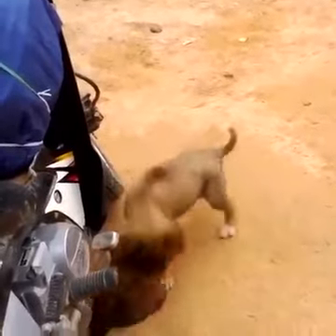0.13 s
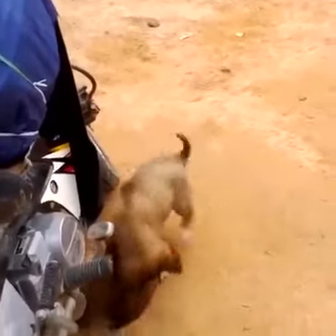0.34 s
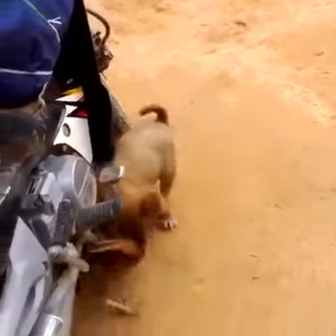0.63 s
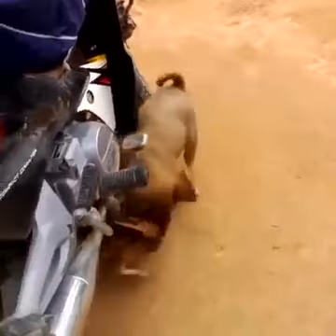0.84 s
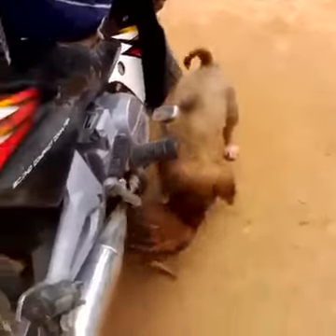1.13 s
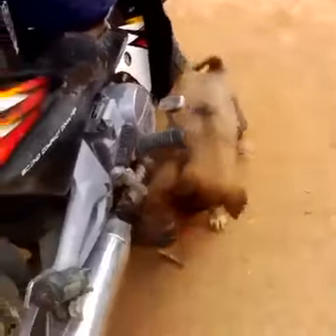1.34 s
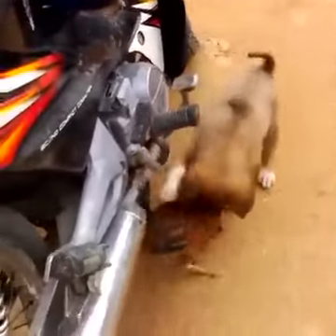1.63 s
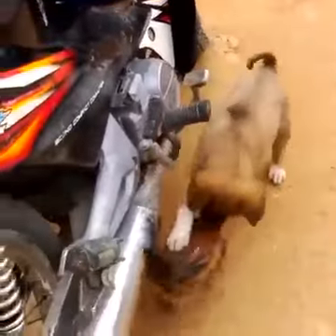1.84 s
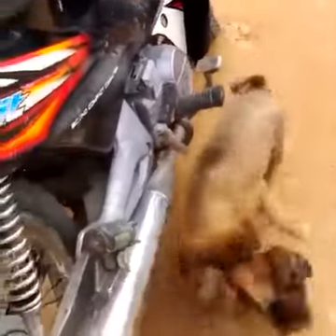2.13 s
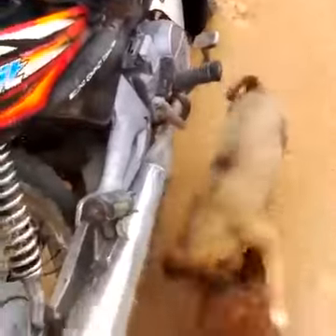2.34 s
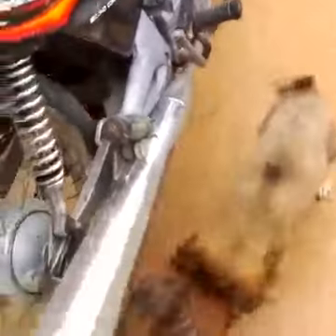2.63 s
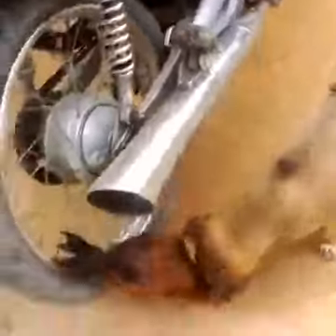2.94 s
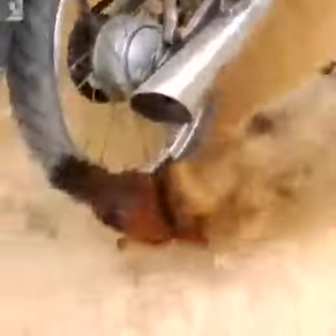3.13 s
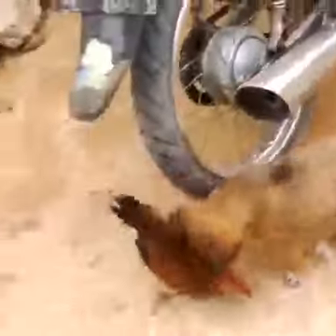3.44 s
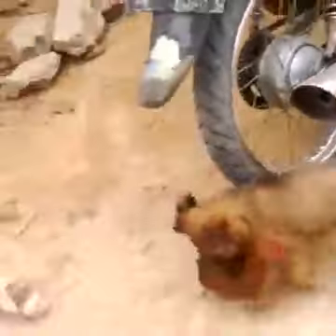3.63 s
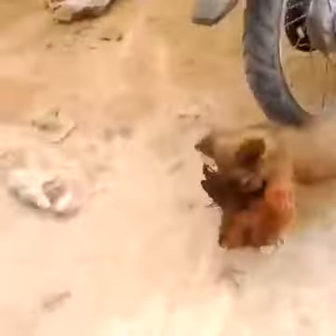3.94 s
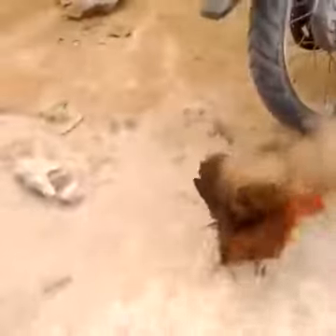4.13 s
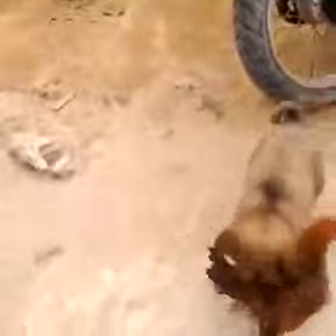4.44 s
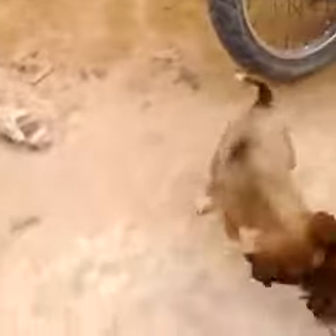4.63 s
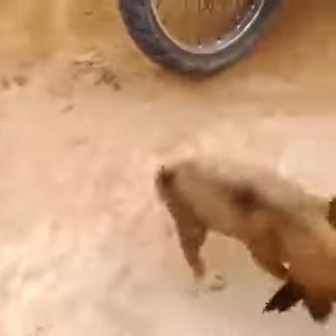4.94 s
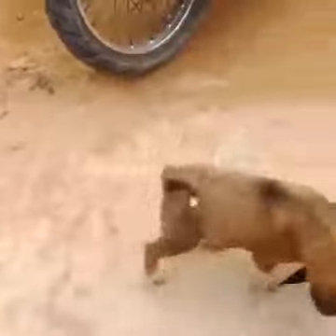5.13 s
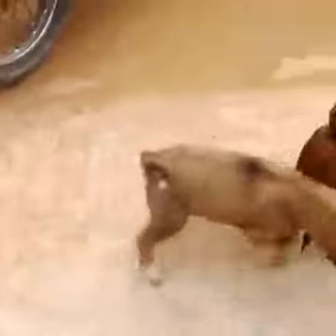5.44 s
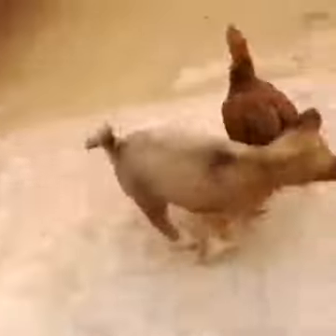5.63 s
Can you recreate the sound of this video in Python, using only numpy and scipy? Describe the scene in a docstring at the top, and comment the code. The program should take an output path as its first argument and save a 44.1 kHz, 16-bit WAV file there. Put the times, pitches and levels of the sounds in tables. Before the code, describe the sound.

A close, dry outdoor scene with a steady soft rush and low puffs of moving air. From 0.06 to 0.4 s a hen makes a thin, lurching high squeal with hoarse rasp, ending in a squawk. Abrupt squawks, each breaking from high to lower pitch, follow at about 0.5 (the loudest), 0.75, 0.93 and 1.2 s. A lull holds one faint falling peep near 1.65 s. Strained, torn little squeals cluster at 1.9-2.2 s, then two short squawks with squeals and rasp at 2.45-2.6 s. Gritty sliding is busiest from 2.3 to 3.8 s, with dull body rubs and a tap at 3.5 s. Squeals flare at 3.3 s and weaken at 3.7-3.9 and 4.2 s. A strong squawk lands at 4.5 s, a tap at 4.64 s, thin squeals at 4.75 s. Then light scuffs, faint peeps, small ticks and a weak rasp near 5.7 s.

```python
"""On a dusty yard, close to the microphone, a puppy wrestles with a hen.
The hen's voice box makes falling squawks, thin strained squeals and a hoarse rasp: swinging tones and noise.
Shaped noise makes the scuffs and taps on the dirt, the quiet outdoor rush and the moving air.
Nearby walls and a quick echo answer the hen; a few faint peeps fall in pitch."""
import sys
import numpy as np
from scipy import signal
from scipy.fft import rfft, irfft, next_fast_len
from scipy.io import wavfile
from scipy.ndimage import uniform_filter1d, map_coordinates

SR = 44100
rng = np.random.default_rng(int(sys.argv[2]) if len(sys.argv) > 2 else 0)


def to_wav(sig):
    """Store sig (one row per channel, or 1-D mono) as 16-bit WAV at the path in sys.argv[1].

    Samples outside -1..1 are clipped; the rate is SR.
    """
    pcm = np.clip(np.atleast_2d(sig), -1, 1) * 32767
    pcm = np.round(pcm).astype(np.int16)
    wavfile.write(sys.argv[1], SR, pcm.T)  # frames by channels


N = 254412
TOP_HZ = 14200  # nothing is kept above this

# Short squeals of the strained voice, many near 1500 or 2700 Hz, before a small overall trim:
# start_s, end_s, pitch_hz, level_db, roughness (0-1)
SQUEAL_NOTES = [(0.07, 0.086, 1734, -39.5, 0.2), (0.087, 0.096, 1484, -38.5, 0.25),
                (0.095, 0.113, 1850, -40.0, 0.18), (0.274, 0.297, 796, -39, 0.37),
                (0.724, 0.742, 2990, -48.5, 0.3), (0.745, 0.752, 2470, -34.5, 0.2),
                (0.97, 0.977, 1588, -35, 0.36), (1.194, 1.204, 2800, -45.5, 0.15),
                (1.875, 1.913, 1557, -44, 0.2), (1.889, 1.917, 798, -43, 0),
                (1.909, 1.932, 1530, -38.0, 0.16), (1.927, 1.945, 3220, -48.5, 0.42),
                (1.929, 1.952, 1518, -41.5, 0.48), (1.95, 1.965, 3180, -48, 0.37),
                (1.953, 1.974, 1540, -47.5, 0.44), (1.975, 1.991, 2390, -54.5, 0),
                (1.976, 1.99, 1120, -51, 0.3), (2.125, 2.146, 2550, -54.5, 0),
                (2.14, 2.157, 1443, -42.5, 0.3), (2.154, 2.175, 3650, -45, 0.14),
                (2.162, 2.18, 1785, -34.0, 0.16), (2.178, 2.191, 1417, -29, 0.35),
                (2.185, 2.199, 3030, -42.5, 0.6), (2.193, 2.207, 1693, -45.5, 0.45),
                (2.433, 2.446, 3190, -42.5, 0.03), (2.446, 2.47, 3480, -37, 0.3),
                (2.493, 2.508, 2490, -45.5, 0.45), (2.521, 2.533, 3000, -41, 0.2),
                (2.537, 2.552, 2920, -38, 0.2), (2.562, 2.581, 2860, -46, 0.5),
                (2.576, 2.582, 1754, -42.5, 0.1), (3.272, 3.29, 2048, -31, 0.03),
                (3.287, 3.297, 1878, -30.5, 0.51), (3.295, 3.305, 2216, -31.0, 0.27),
                (3.304, 3.314, 1994, -36, 0.55), (3.312, 3.322, 2800, -38.5, 0.27),
                (3.32, 3.334, 2060, -44.0, 0.35), (3.698, 3.706, 1407, -42, 0.36),
                (3.711, 3.732, 1390, -38, 0.06), (3.733, 3.753, 1486, -47.0, 0.43),
                (3.745, 3.763, 2500, -47, 0.1), (3.773, 3.79, 2550, -49.5, 0.07),
                (3.798, 3.814, 2580, -52, 0.15), (3.829, 3.848, 2690, -43.5, 0.08),
                (3.849, 3.856, 1460, -43, 0.3), (3.856, 3.869, 2676, -41.5, 0.13),
                (3.872, 3.879, 1400, -40.0, 0.2), (3.882, 3.895, 2550, -47.5, 0.15),
                (4.171, 4.182, 1570, -54, 0.55), (4.186, 4.198, 1350, -44, 0.15),
                (4.198, 4.207, 1650, -45, 0.4), (4.228, 4.245, 1735, -44, 0.5),
                (4.233, 4.244, 2450, -46.5, 0.05), (4.245, 4.257, 1440, -44.5, 0.52),
                (4.252, 4.265, 2500, -43.5, 0.2), (4.453, 4.469, 2580, -47, 0.2),
                (4.498, 4.512, 1258, -38.5, 0.5), (4.535, 4.552, 2590, -61, 0.2),
                (4.74, 4.752, 1607, -48.5, 0.46), (4.749, 4.773, 1410, -45.5, 0.08),
                (4.769, 4.78, 1520, -45, 0.5), (4.783, 4.793, 1850, -49, 0.2),
                (4.786, 4.798, 2530, -44, 0.25), (4.799, 4.815, 1507, -50.5, 0.5),
                (4.802, 4.821, 2510, -48.5, 0), (5.713, 5.766, 1830, -52.5, 0.52)]
# Strength of each harmonic in the long squeal and the peeps, from the first up: level_db
WHISTLE_HARMONICS = [0, -18, -29]


def amp(db):
    """Turn decibels into a gain."""
    return 10 ** (np.asarray(db) / 20)


def unit(x):
    """Scale to an average (rms) strength of 1."""
    return x / np.sqrt(np.mean(x ** 2) + 1e-20)


def along(points, hz):
    """Read (Hz, value) points at any frequency, on a log axis."""
    f, v = np.transpose(points)
    return np.interp(np.log(hz + 1), np.log(f + 1), v)


def curves(rows, t):
    """Read each column after the time column at the times t."""
    s, *cols = np.transpose(rows)
    return [np.interp(t, s, c) for c in cols]


def wobble(rate, size=N):
    """Draw a smooth random curve through `rate` random points a second."""
    knots = rng.standard_normal(int(N * rate / SR) + 4)
    return map_coordinates(knots, [np.arange(size) * rate / SR])


def filtered(x, gain):
    """Multiply the spectrum of x by a gain that depends on frequency."""
    m = next_fast_len(len(x) + 8192)  # spare room for the ringing
    return irfft(rfft(x, m) * gain(np.fft.rfftfreq(m, 1 / SR)), m)[:len(x)]


def coloured(x, spectrum):
    """Shape x with (Hz, dB) points and scale it to rms 1."""
    return unit(filtered(x, lambda hz: amp(along(spectrum, hz))))


def note(start, end, edge):
    """Sample numbers of a call, and a gate that opens and closes over edge seconds around it."""
    start, end = start - edge, end + edge
    i = np.arange(max(int(start * SR), 0), min(int(end * SR), N))
    ramp = np.clip(np.minimum(i / SR - start, end - i / SR) / edge, 0, 1)
    return i, np.sin(np.pi / 2 * ramp) ** 2


def swells(rows, roundness):
    """A gain that rises and falls once for each (start, end, dB) row."""
    t = np.arange(N) / SR
    gain = np.zeros(N)
    for start, end, db in rows:
        progress = np.clip((t - start) / (end - start), 0, 1)
        gain += amp(db) * np.abs(np.sin(np.pi * progress)) ** roundness
    return gain


def whistle(pitch, overtones):
    """A tone of rms 1 that follows the pitch, with the given harmonic levels."""
    phase = 2 * np.pi * np.cumsum(pitch) / SR
    return unit(sum(amp(db) * np.sin(k * phase) for k, db in enumerate(overtones, 1)))


def yard(rush_db=-55.5, rumble_db=-2, swell_db=1.0):
    """A nearly steady outdoor rush, and soft low lumps of air moving over the microphone."""
    # Colour of the outdoor rush: frequency_hz, level_db (per Hz)
    rush_colour = [(25, -9.5), (170, -3), (280, -11.5), (450, -9), (1200, -17), (4200, -22), (5200, -16),
                   (7800, -25), (12600, -17), (14000, -29)]
    # Strength of the moving air, before rumble_db: time_s, level_db
    air_levels = [(1.8, -59.5), (4.5, -56), (5.2, -59.5), (5.7, -57)]
    lump_colour = [(8, -15.0), (22, -2.5), (60, -9.5), (170, -13.5), (400, -25.5), (1500, -60)]  # Hz, dB
    air_db, = curves(air_levels, np.arange(N) / SR)
    lumps = coloured(rng.standard_normal(N) * amp(swell_db * wobble(6.7)), lump_colour)
    rush = coloured(rng.standard_normal(N), rush_colour)
    return amp(rush_db + 0.96 * wobble(5.34)) * rush + amp(air_db + rumble_db) * lumps


def scuffs(grit_db=3.0, shuffle_db=-63):
    """Sliding paws and feathers roll fine grit over the ground; the bodies rub with a duller sound."""
    # Paws and feathers slide over the dirt: start_s, end_s, level_db
    slides = [(.07, .4, -58.5), (1.1, 1.22, -54), (2.33, 2.42, -45.5), (2.43, 2.6, -47.5),
              (2.64, 2.93, -49.5), (3.1, 3.16, -49.5), (3.44, 3.56, -46), (3.68, 3.79, -52),
              (4.38, 4.45, -48.5), (4.93, 5.02, -54.5), (5.07, 5.125, -52.5), (5.32, 5.37, -55),
              (5.49, 5.57, -57), (5.68, 5.8, -52)]
    # Bodies drag on the ground: start_s, end_s, level_db
    drags = [(2.72, 2.8, -53.5), (3.47, 3.55, -49), (3.6, 3.64, -47), (3.72, 3.78, -49.5),
             (5.66, 5.8, -50.5)]
    # Colour of the rolling grit: frequency_hz, level_db (per Hz)
    grit_colour = [(200, 1.5), (700, -3.5), (2400, -8.5), (7000, -4), (12600, 1.5)]
    shuffle = amp(shuffle_db) * amp(2.5 * wobble(10))  # a faint restless shuffle never stops
    grit = coloured(rng.standard_normal(N) * amp(grit_db * wobble(1500)), grit_colour)
    rub = coloured(rng.standard_normal(N), [(40, -5), (150, -2.5), (500, -6.0), (3000, -25.5)])
    return (swells(slides, roundness=0.57) + shuffle) * grit + swells(drags, roundness=0.83) * rub


def wail(jitter=0.025, shimmer_db=2.0, tear=0.37, leap_hz_per_s=45000, level_db=-0.5):
    """A drawn-out whistle with a lurching pitch; the voice fades on the fastest leaps."""
    # One long wavering squeal, before level_db: time_s, pitch_hz, level_db
    wail_path = [(0.06, 2345, -59), (0.068, 2462, -45), (0.08, 2846, -51), (0.106, 2771, -42),
                 (0.116, 3354, -44), (0.126, 3340, -46), (0.136, 2673, -49), (0.14, 2710, -42),
                 (0.152, 3338, -44), (0.17, 2800, -47), (0.184, 2825, -41), (0.194, 3369, -40),
                 (0.212, 2886, -51), (0.23, 2886, -39), (0.242, 3590, -44), (0.25, 2786, -41),
                 (0.27, 2856, -35.5), (0.28, 2984, -45), (0.31, 2850, -45), (0.324, 3228, -39),
                 (0.334, 3083, -42), (0.35, 3369, -36), (0.376, 3270, -49), (0.394, 2820, -46),
                 (0.41, 2763, -59)]
    out = np.zeros(N)
    i, gate = note(wail_path[0][0], wail_path[-1][0], edge=0.0029)
    pitch, db = curves(wail_path, i / SR)
    # how fast the pitch moves, smoothed over about 3 ms
    leap = uniform_filter1d(np.abs(np.gradient(pitch)) * SR / leap_hz_per_s, size=130)
    tone = whistle(pitch * (1 + jitter * wobble(500, len(i))), WHISTLE_HARMONICS)
    tone *= 1 + tear * wobble(1100, len(i))
    level = amp(db + level_db + shimmer_db * wobble(220.4, len(i)))
    out[i] = gate * level * tone / (1 + leap ** 2)
    return out


def clear_voice():
    """0 to 1: how firmly the voice box is locked on a clean squeal, which leaves less room for flutter."""
    out = np.zeros(N)
    for start, end, _, _, rough in SQUEAL_NOTES:
        i, gate = note(start, end, edge=.001)
        out[i] = np.maximum(out[i], gate * np.clip(1 - 2 * rough, 0, 1))
    return out


def rasp(voice_hz=730, lurch=.13, flutter_db=2.5, partial_db=6, air_db=-7, yield_db=-6, level_db=-1):
    """The voice box flutters wildly: harmonics flare and drop out, with some air, shaped by throat and beak."""
    # Hoarse bursts in the hen's voice, before level_db: start_s, end_s, level_db
    rasp_bursts = [(.06, .41, -48.5), (.335, .392, -43.5), (1.198, 1.25, -45), (1.925, 2.02, -53.5),
                   (2.168, 2.212, -40), (2.432, 2.52, -39), (2.52, 2.6, -45), (3.286, 3.335, -44.5),
                   (3.685, 3.92, -51), (4.17, 4.29, -47), (4.738, 4.85, -48), (5.68, 5.82, -52)]
    # Colour given by throat and beak: frequency_hz, level_db
    beak_colour = [(250, -27), (550, -2.5), (900, 0.5), (1500, 3.5), (2100, -2), (2900, 0.5), (4000, -2.5),
                   (5000, -11.5), (8500, -7.5), (10500, -6.5), (13000, -18.5)]
    phase = 2 * np.pi * np.cumsum(voice_hz * np.exp(lurch * wobble(170))) / SR
    voice = np.zeros(N)
    for k in range(1, 16):
        voice += amp(partial_db * np.tanh(wobble(190))) * np.sin(k * phase)
    air = amp(air_db) * rng.standard_normal(N)
    hoarse = coloured((unit(voice) + air) * amp(flutter_db * wobble(500)), beak_colour)
    return amp(level_db + yield_db * clear_voice()) * swells(rasp_bursts, roundness=0.31) * hoarse


def squeals(waver=0.067, tear=0.94, scatter=1.2, roundness=.45, level_db=-0.5):
    """The tightly stretched voice box whistles in short arches; an uneven rattle tears the rough ones."""
    # The squeals grow reedier as the struggle goes on: time_s, second_harmonic_db
    reediness = [(3.2, -24.5), (3.75, -9.5)]
    arch_share = .1  # each pitch rises and falls back by this share
    harmonic_step_db = 6.5  # each harmonic after the second is weaker by this much
    out = np.zeros(N)
    for start, end, hz, db, rough in SQUEAL_NOTES:
        i, gate = note(start + .002, end - .002, edge=.0045)
        size = len(i)
        arch = np.sin(np.pi * (np.arange(size) + .5) / size)
        pitch = hz * (1 + arch_share * (arch - np.pi / 4) + waver * rough * wobble(262, size))
        phase = 2 * np.pi * np.cumsum(pitch) / SR + scatter * rough * wobble(1101, size)
        reedy_db, = curves(reediness, start)
        tone = np.sin(phase)
        for k in range(2, 5):
            # the -2.5 makes the second harmonic half a step stronger than reedy_db
            tone += amp(reedy_db - harmonic_step_db * (k - 2.5)) * np.sin(k * phase)
        rattle = 1 + tear * rough * wobble(1397, size)
        out[i] += amp(db + level_db) * unit(gate * arch ** roundness * tone * rattle)
    return out


def walls(x, delay=.012):
    """A short answer made of fading noise, whose highest sounds die first; delay in seconds."""
    # How long the answer takes to fade by 60 dB: frequency_hz, fade_s
    fade_times = [(500, 0.25), (4000, 0.35), (12000, 0.12)]
    hz, t, z = signal.stft(rng.standard_normal(SR // 2), SR, nperseg=256)
    fade = amp(-60 * t / along(fade_times, hz)[:, None])
    tail = signal.istft(z * fade, SR, nperseg=256)[1]
    late = np.pad(x, (int(delay * SR), 0))
    return signal.fftconvolve(late, tail / np.linalg.norm(tail))[:N]


def motorcycle_echo(hen, echo_db=-21, echo_s=.017):
    """One quick, weaker copy of the hen off the motorcycle beside her, delayed by turning the phases."""
    return filtered(hen, lambda hz: amp(echo_db) * np.exp(-2j * np.pi * hz * echo_s))


def taps(tick_t60=0.082, thud_t60=0.03, tick_db=-7, thud_db=-7):
    """Claws and wing strike the dirt: a gritty tick and a dull thud of noise, each fading 60 dB in its t60."""
    # Each strike, before tick_db and thud_db: time_s, level_db, extra_thud_db
    strikes = [(0.204, -28.5, -5.5), (0.684, -30.5, -34), (3.503, -31, -8), (4.639, -32.5, -1),
               (5.443, -35.5, -30), (5.633, -34, -21)]
    tick_colour = [(300, 0), (2000, -9.0), (7000, -3.0), (13000, -0.5)]  # Hz, dB
    thud_colour = [(60, -3), (250, 5), (800, 10), (2000, -29), (5000, -52)]  # Hz, dB
    out, t = np.zeros(N + SR), np.arange(SR // 8) / SR
    onset = 1 - np.exp(-t / 0.0009)
    for s, db, low_db in strikes:
        tick = coloured(rng.standard_normal(len(t)), tick_colour) * amp(tick_db - 60 * t / tick_t60)
        thud = coloured(rng.standard_normal(len(t)), thud_colour) * amp(thud_db + low_db - 60 * t / thud_t60)
        out[round(s * SR):][:len(t)] += amp(db) * (tick + thud) * onset
    return out[:N]


def effort(t, attack, hold, release):
    """Level of a squawk in dB below its top, t seconds after its start: it swells, holds and dies."""
    rise_db, fall_db, rise_curve = 21.5, 27.5, 1.08  # the swell slows slightly near the top
    rise = rise_db * np.maximum(1 - t / attack, 0) ** rise_curve
    fall = fall_db * np.maximum(t - attack - hold, 0) / release
    return -rise - fall


def squawks(jitter=0.0809, tremor=0.015, uneven_db=2.0, shimmer=0.55, air=0.9):
    """The voice box beats hundreds of times a second into the throat; it is rough while the pitch breaks."""
    # Each squawk starts high and breaks to a low pitch (both pitches before the steady sag):
    # start_s, attack_s, hold_s, release_s, break_after_s, high_hz, low_hz, level_db, roughness (0-1)
    squawk_notes = [ (0.339, 0.022, 0.0091, 0.023, 0.022, 830, 558, -27, 0.09),
                    (0.505, .013, 0.03, 0.036, 0.009, 748, 573, -19, 0.06),
                    (0.74, 0.017, 0.013, 0.028, 0.02, 644, 561.4, -30, 0),
                    (0.926, 0.019, 0.02, 0.019, .012, 833, 584.3, -24, 0.08),
                    (1.193, 0.02, 0.025, 0.017, 0.027, 800, 570, -28.5, 0.19),
                    (2.461, 0.0161, 0.0054, 0.011, 0.014, 810, 729, -26, 0.03),
                    (2.548, 0.006, 0.005, 0.0096, 0.006, 809, 611, -31.5, 0.36),
                    (4.468, 0.017, 0.0098, 0.022, 0.0071, 730.4, 563, -23.5, 0.06), ]
    # Shape of the throat in each squawk, in the same order: lists of frequency_hz, level_db
    throat_shapes = [
        [(600, 0.5), (1200, -12.5), (1700, -17.5), (3400, -18.5), (12000, -45)],
        [(550, -3.5), (1100, 1), (1300, 1.5), (1650, -15), (2700, -18), (3300, -17.5), (3800, -3.5),
         (4300, -13.5), (4900, -16.5), (5600, -33), (6500, -12), (7100, -12.5), (7600, -17.5), (8200, -28),
         (13000, -31)],
        [(580, 0.5), (1200, 0), (1730, -4), (2150, -28), (2800, 2), (3300, -18.5), (3950, -7), (5000, -29.5),
         (9000, -11), (13000, -39)],
        [(560, -7.5), (1120, 0.5), (1700, 0), (2150, -22), (2800, -15.5), (3400, -23), (4000, -20),
         (5500, -27.5), (12000, -29.5)],
        [(560, -4.5), (800, -23), (1120, 6), (1700, 2.5), (2200, -7.5), (3800, -18), (5500, -30), (12000, -49)],
        [(750, -10.5), (1480, 1.5), (2200, -15), (3000, -22), (3800, -17), (5500, -31), (11000, -23)],
        [(600, 4), (1200, -0.5), (1800, -12), (2800, -8), (4500, -52), (11000, -22)],
        [(550, -2), (1100, 2), (1650, -13), (2180, -7), (2750, -16.5), (3300, -5), (3850, -12), (4500, -21),
         (7200, -16.5), (8300, -19), (12000, -28)],
    ]
    # The voice catches for an instant: time_s, level_db
    catches = [(0.525, -7), (1.214, -15)]
    catch_s = 0.005  # from the deepest point to where most of the dip is gone
    break_s, sag_hz_per_s = 0.0039, 1083  # speed of the break; the pitch also sags all through
    break_rough, weak_rough_per_db = 0.13, 0.02  # rougher at the break and where the voice is weak
    throat_sink_per_s = 0.92  # the throat's resonances sink at this rate as the beak closes
    out = np.zeros(N)
    k = np.arange(1, 27)[:, None]  # harmonic numbers
    for row, throat in zip(squawk_notes, throat_shapes):
        start, attack, hold, release, break_after, high_hz, low_hz, top_db, roughness = row
        i, gate = note(start, start + attack + hold + release, edge=.006)
        size = len(i)
        t = i / SR - start
        db = effort(t, attack, hold, release)
        for s, dip in catches:
            db = db + dip * np.exp(-((i / SR - s) / catch_s) ** 2)
        broken = np.tanh((t - break_after) / break_s)  # -1 before the break, 1 after
        pitch = low_hz + (high_hz - low_hz) * (1 - broken) / 2 - sag_hz_per_s * (t - break_after)
        rough = np.clip(roughness + break_rough * (1 - broken ** 2) - weak_rough_per_db * db, 0, 1)
        shaky_pitch = pitch * (1 + (jitter * rough + tremor) * wobble(618.0, size))
        phase = 2 * np.pi * np.cumsum(shaky_pitch) / SR
        stretch = np.exp(-throat_sink_per_s * (t - attack - hold / 2))
        gains = amp(along(throat, k * pitch / stretch)) * (k * pitch < TOP_HZ)
        # each beat rings on after the voice box shuts: the throat's shape sets each harmonic's delay
        log_gain = np.log(np.vstack([gains[:1] / 10, gains]) + 1e-3)
        mirrored = np.vstack([log_gain, log_gain[-2:0:-1]])
        lag = signal.hilbert(mirrored, axis=0).imag[1:len(k) + 1]
        # no two beats are alike, so the higher harmonics fray first
        fray = (.04 + .2 * rough) * k * np.array([wobble(300, size) for _ in k])
        gains = gains * amp(uneven_db * np.array([wobble(148, size) for _ in k]))
        tone = np.sum(gains * np.cos(k * phase - lag + fray), 0) / np.sqrt(np.sum(gains ** 2, 0) / 2)
        tone *= 1 + shimmer * rough * wobble(428.3, size)
        # turbulent air escapes once per beat
        puffs = coloured(rng.standard_normal(size) * (1 + np.cos(phase)), [(250, -40), *throat])
        share = np.clip(air * rough, 0, 1)
        voice = np.sqrt(1 - share ** 2) * tone + share * puffs
        out[i] += gate * amp(top_db + db) * voice
    return out


def peeps(waver_hz=90):
    """Each faint peep is one soft arch of a thin, falling whistle."""
    # start_s, pitch_hz, level_db (of the tone before the arch)
    peep_notes = [(1.645, 2420, -60), (4.92, 2960, -64), (5.575, 2550, -62)]
    length_s, fall_hz_per_s = .06, 4000
    out = np.zeros(N)
    for start, hz, db in peep_notes:
        middle = start + length_s / 2
        i, gate = note(middle, middle, edge=length_s / 2)
        pitch = hz - fall_hz_per_s * (i / SR - middle) + waver_hz * wobble(300, len(i))
        out[i] += amp(db) * np.sqrt(gate) * whistle(pitch, WHISTLE_HARMONICS)
    return out


def scene(wet_db=-24.5):
    """The hen with her echo and the walls' answer, then the peeps, the scuffle and the yard."""
    hen = squawks() + squeals() + wail() + rasp()
    answered = hen + motorcycle_echo(hen) + amp(wet_db) * walls(hen)
    return (answered + peeps() + scuffs() + taps() + yard())[None]


def record(dry, shelf_db=-9):
    """The microphone dulls the very top, above 13100 Hz, and keeps nothing above its band limit."""
    return filtered(dry[0], lambda hz: np.where(hz > 13100, amp(shelf_db), 1) * (hz < TOP_HZ))[None]


dry = scene()
out = record(dry)
to_wav(out)
```